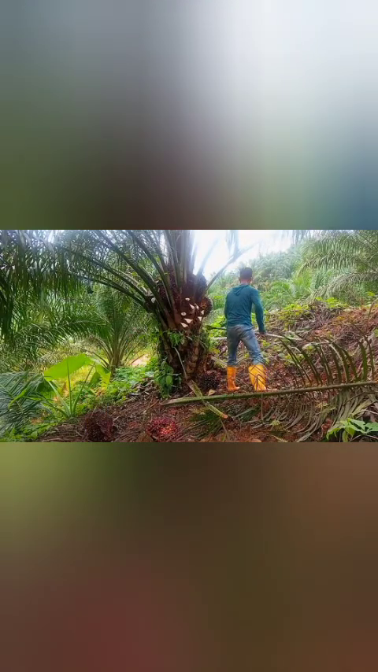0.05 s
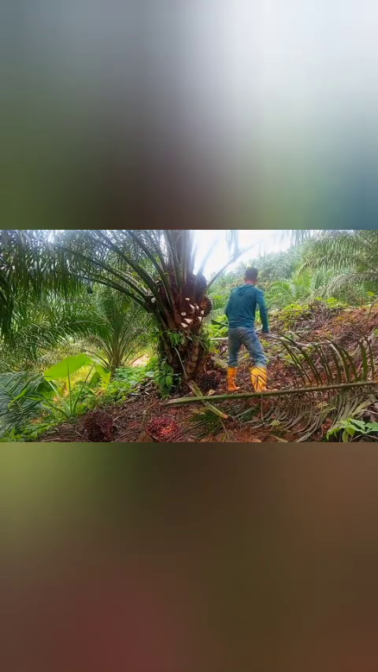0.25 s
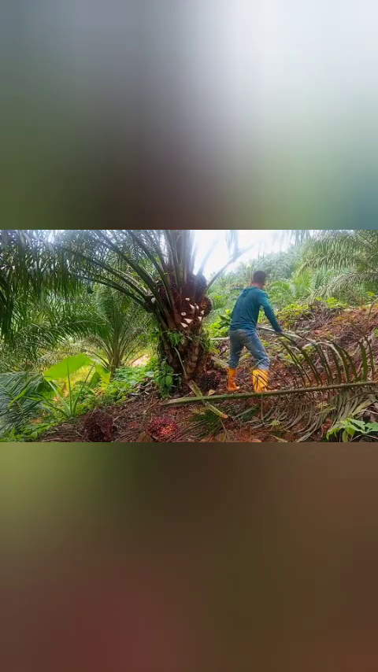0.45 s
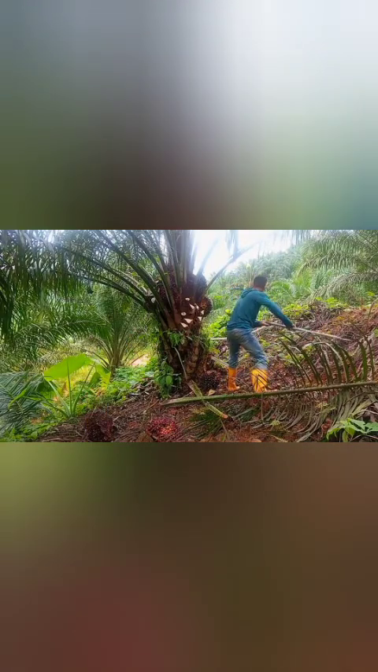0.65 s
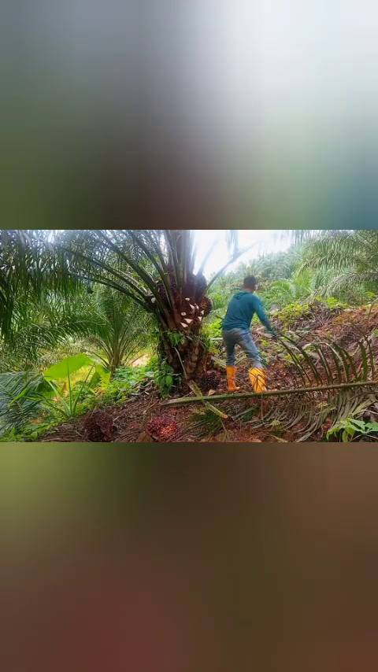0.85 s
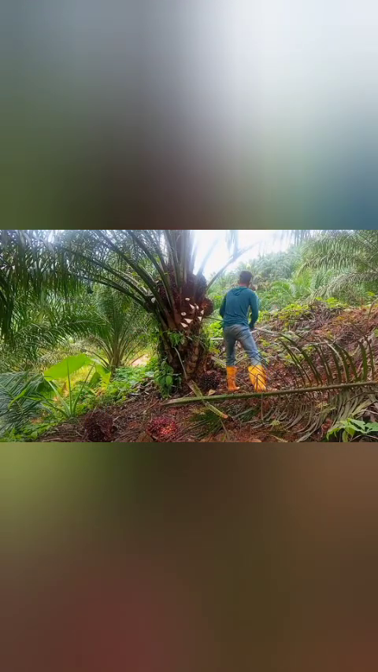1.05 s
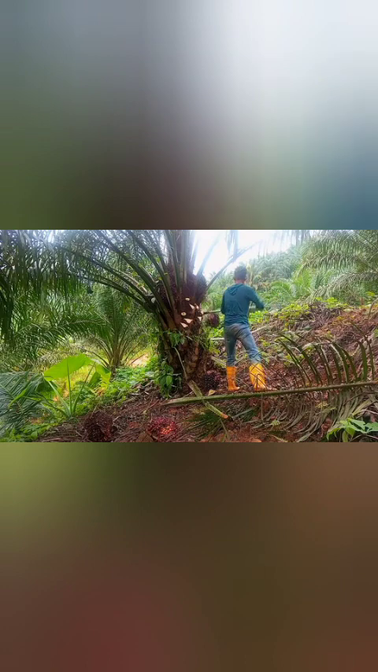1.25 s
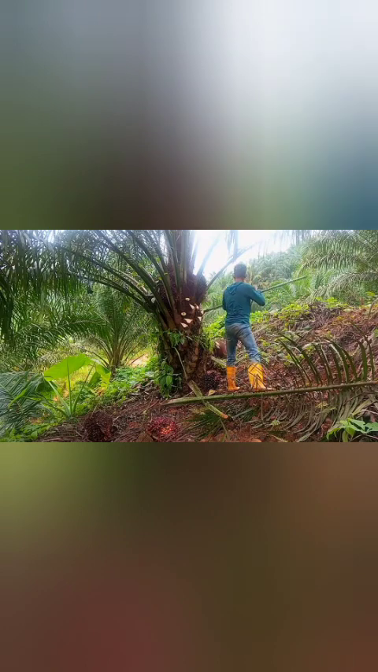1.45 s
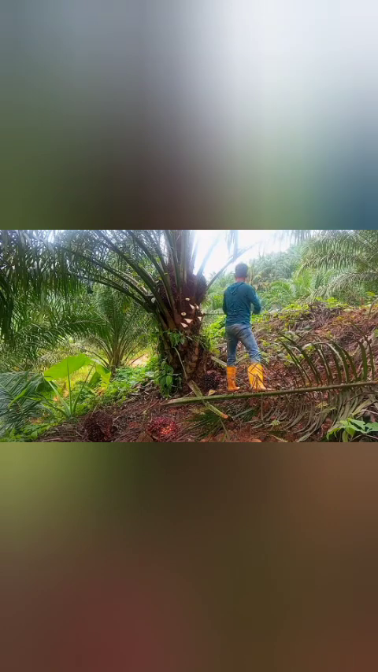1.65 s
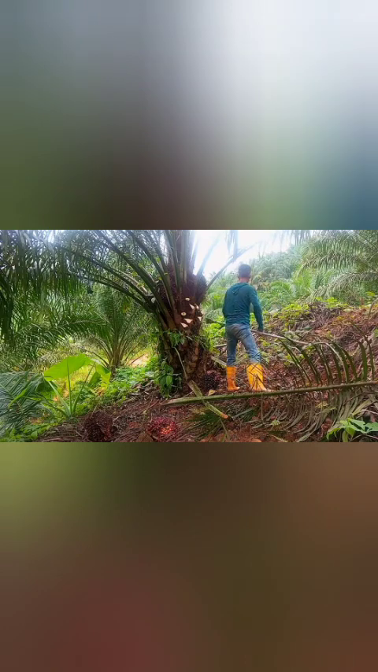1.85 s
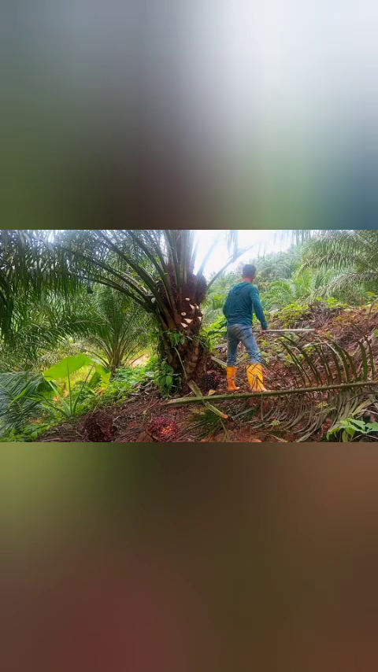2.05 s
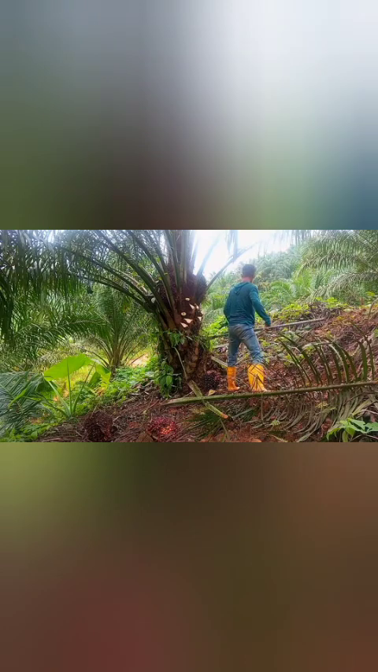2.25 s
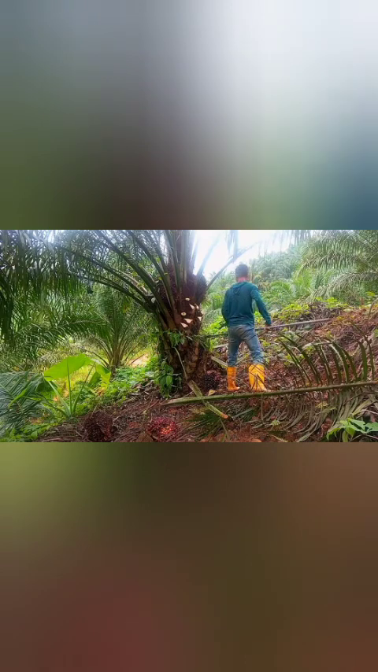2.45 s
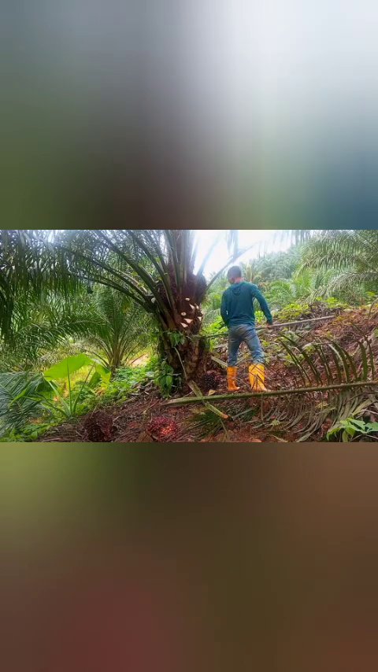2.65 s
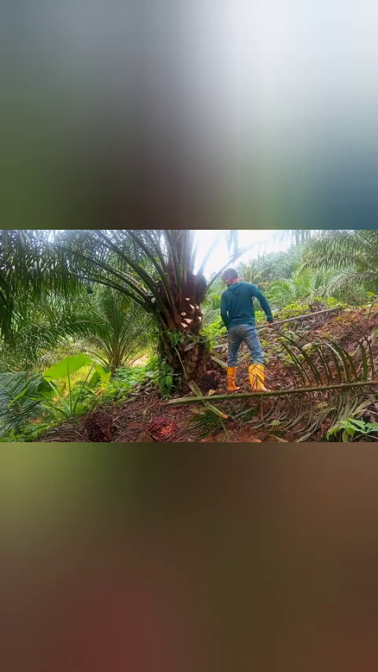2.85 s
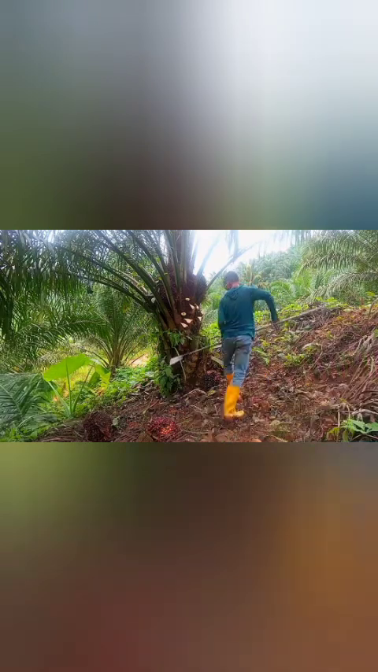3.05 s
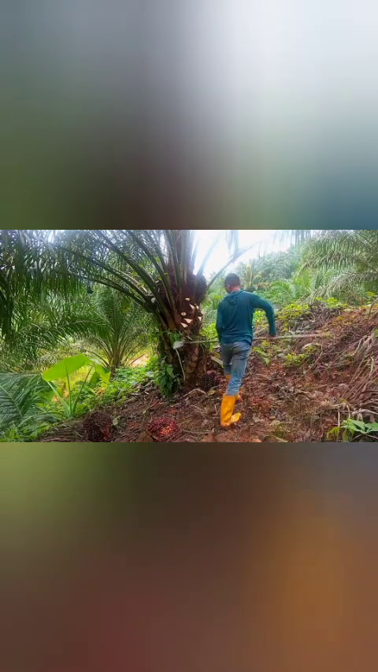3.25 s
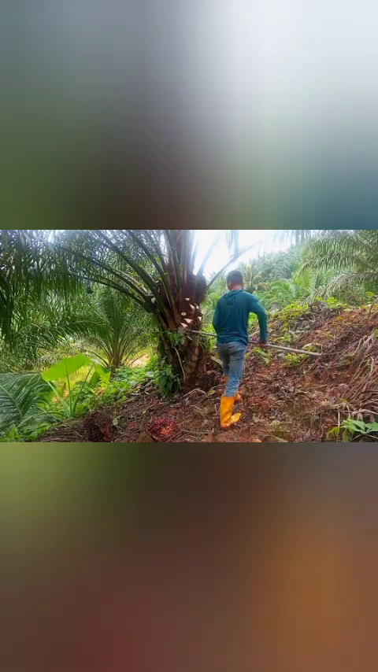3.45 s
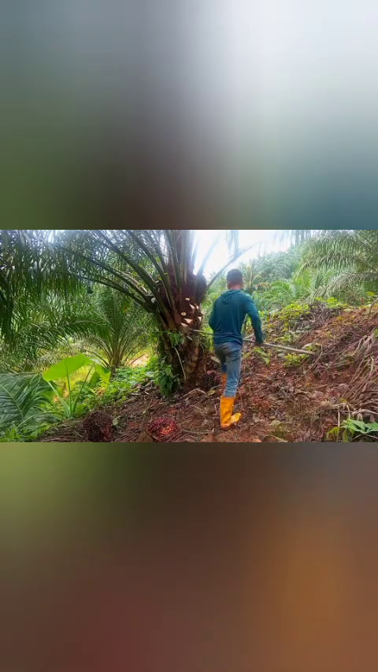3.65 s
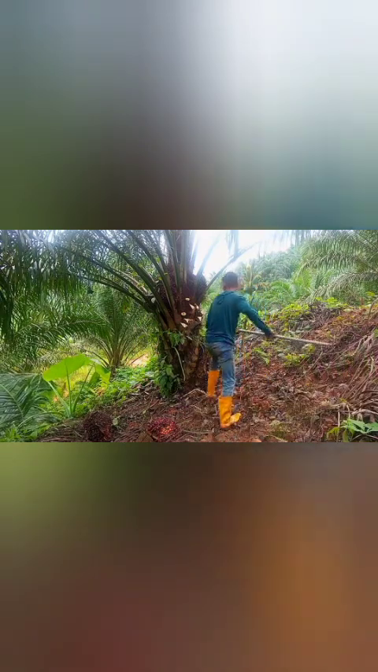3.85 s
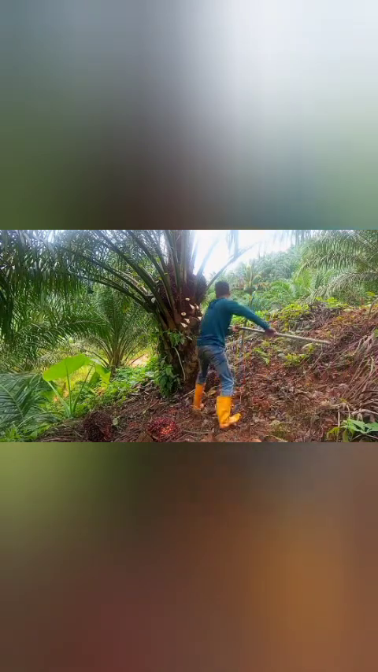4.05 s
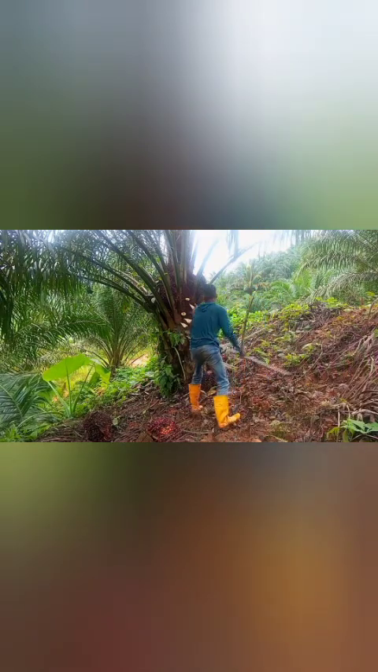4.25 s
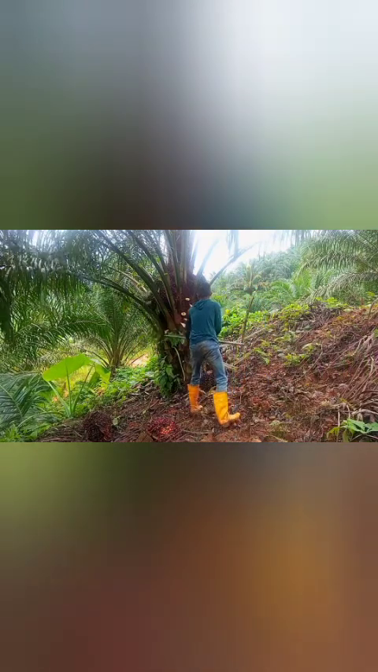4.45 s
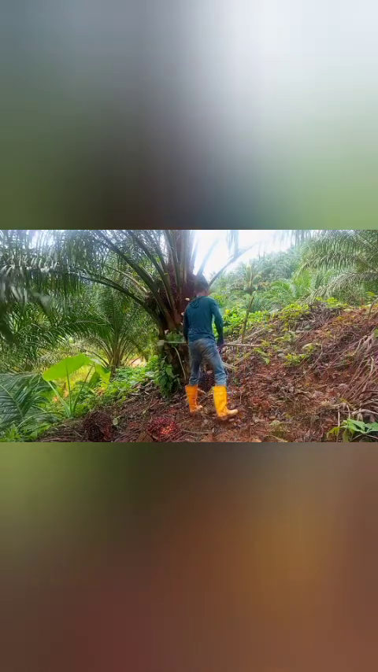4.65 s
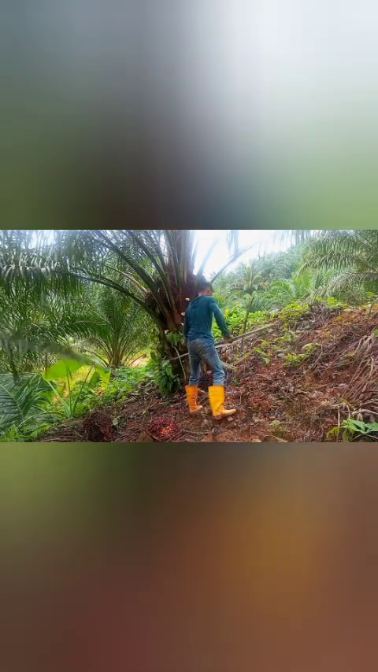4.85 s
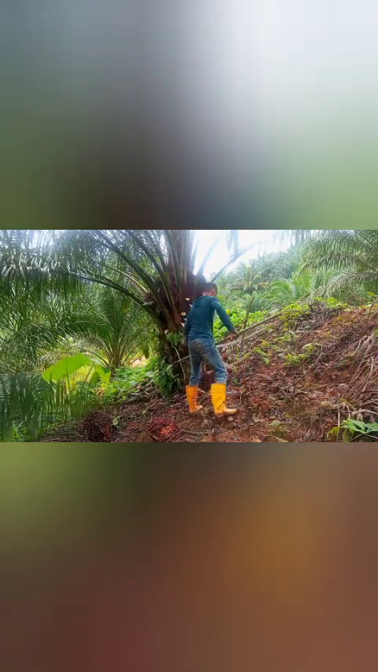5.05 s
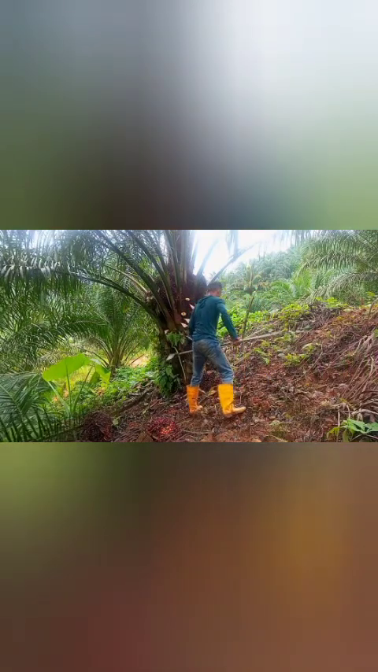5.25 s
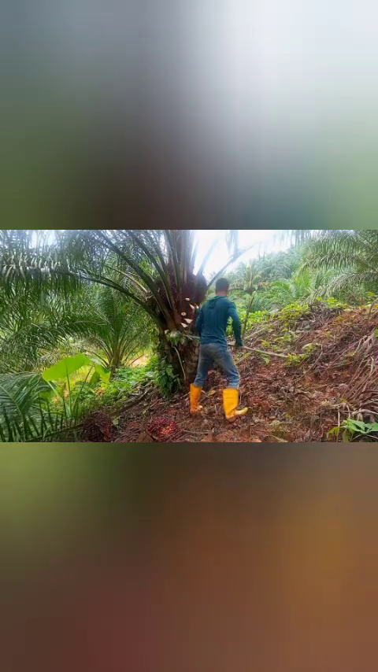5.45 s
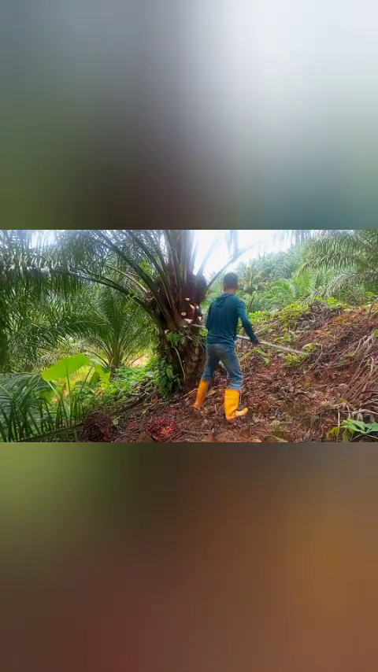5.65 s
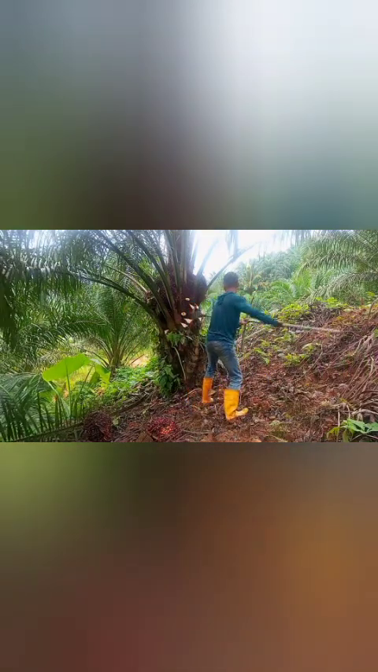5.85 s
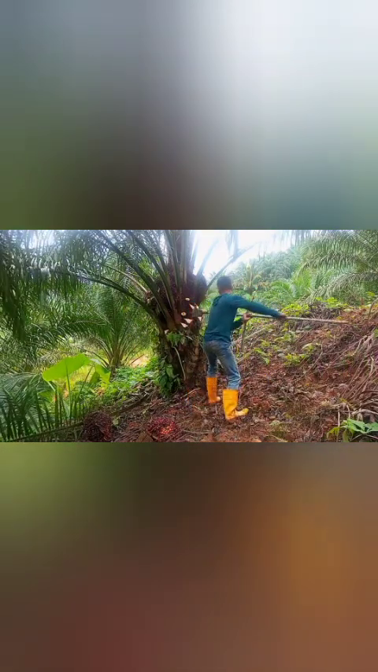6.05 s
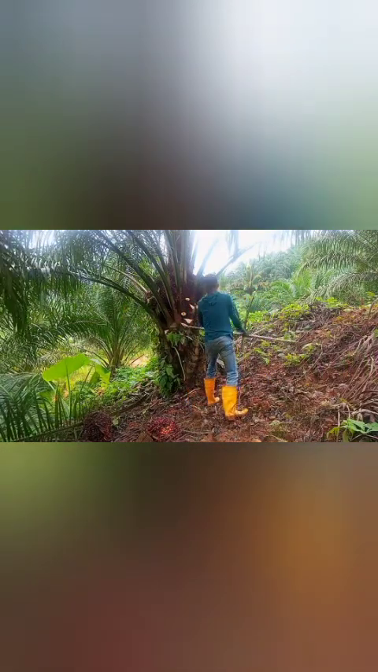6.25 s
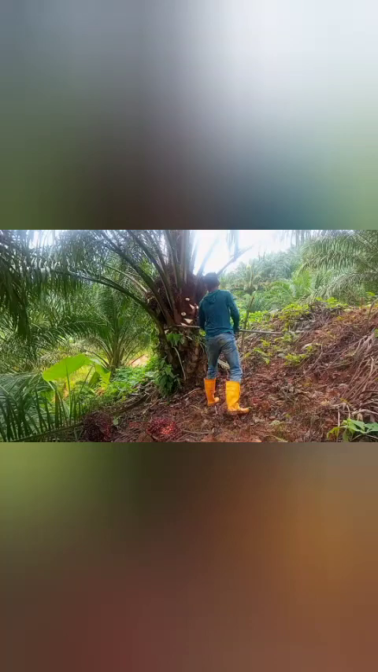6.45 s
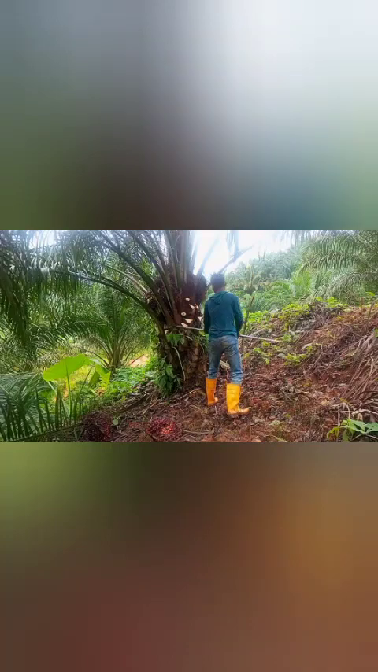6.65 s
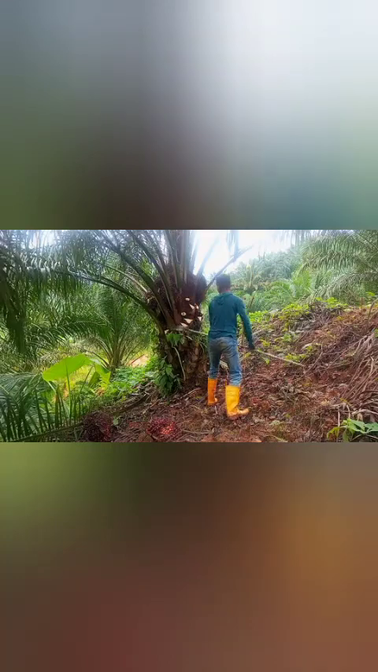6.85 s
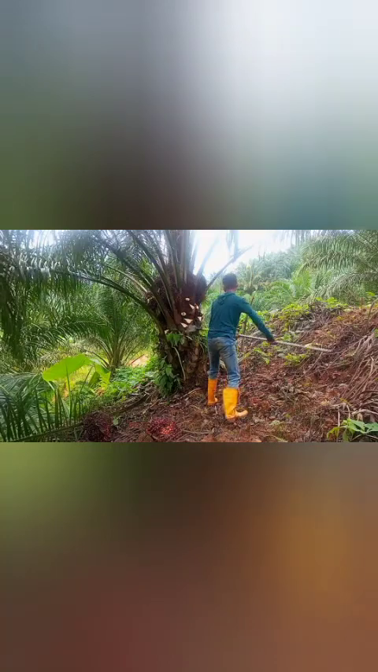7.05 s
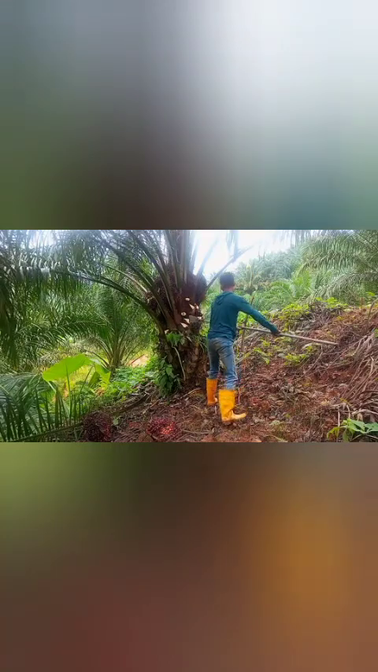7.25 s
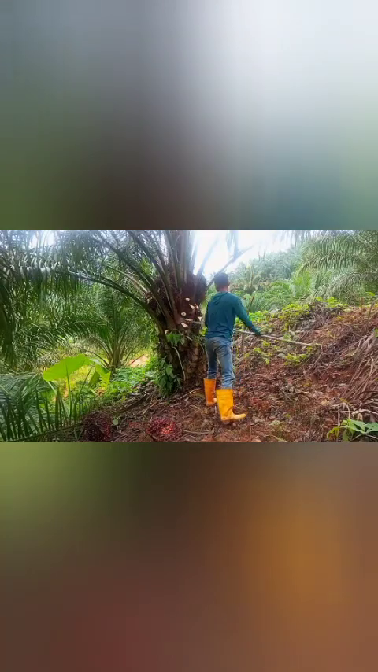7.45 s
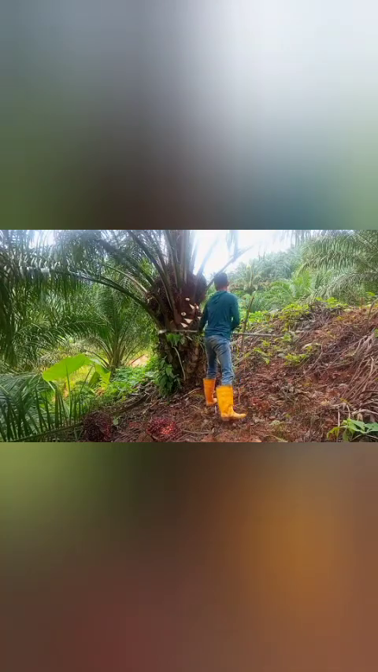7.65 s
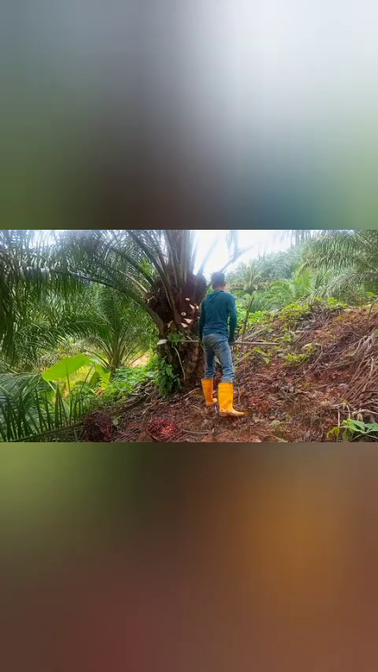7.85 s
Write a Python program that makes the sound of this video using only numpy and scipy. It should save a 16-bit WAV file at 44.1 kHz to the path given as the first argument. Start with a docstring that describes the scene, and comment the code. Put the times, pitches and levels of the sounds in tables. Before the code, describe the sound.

Outdoors on a palm slope, a long-handled blade strikes stalks some metres from a small microphone. A crunchy chop near one second leads to smaller knocks and tearing, then a pause. A hard blow after four seconds brings a frond down, rustling and dragging. More chops follow near six and seven and a half seconds. High cicadas buzz steadily behind, with cricket trills, faint birdsong and a distant rooster.

```python
"""On a plantation slope, a long-handled chisel chops palm stalks some metres away.
Each cut is crackling, coloured noise for torn fibre and leaflets, plus ringing tones for the knocked stalk;
a frond falls and is dragged, low swings thud on the soil and a rubber boot creaks.
Behind it are a cicada chorus of dense clicks, a rasping cricket, short gliding notes of birds and an insect,
a far rooster of a few hoarse partials and a faint stir of air."""
import sys
import numpy as np
from scipy import signal
from scipy.io import wavfile
from scipy.ndimage import uniform_filter1d, map_coordinates

SR = 44100
rng = np.random.default_rng(int(sys.argv[2]) if len(sys.argv) > 2 else 0)


def to_wav(s):
    """Save 16-bit WAV."""
    ch = np.atleast_2d(s).T  # columns
    pcm = np.round(np.clip(ch, -1, 1) * 32767)  # PCM
    wavfile.write(sys.argv[1], SR, pcm.astype(np.int16))


N = 348831
T = np.arange(N) / SR  # t/s of every sample

# Tone colours, relative only: f/Hz, level/dB (per Hz)
AIR_COLOUR = [(20, -14), (45, -9.5), (100, -1), (200, -5), (500, -9.5), (1700, -12), (3500, -10.5),
              (8500, -20), (10500, -20), (13000, -32), (15000, -23), (16000, -25)]
CICADA_COLOUR = [(3600, -32.5), (4200, -13.5), (4800, -6), (5400, 2.5), (6000, -1), (6500, 0), (7500, 3),
                 (8000, -3), (8500, -23.5), (9200, -52)]
CRUNCH_COLOUR = [(200, -26.5), (400, -8), (600, -3.5), (950, -11), (1300, -5), (1800, -2.5), (2500, -3.5),
                 (3500, -30.5)]
HISS_COLOUR = [(1500, -22.5), (2500, -2), (4000, -3.5), (6000, -2.5), (7000, -9), (8500, -13.5),
               (10000, -28)]
FIZZ_COLOUR = [(7500, -25), (9000, -1), (10500, -12), (12000, -18), (13500, -14.5), (14900, -1.5),
               (16000, -15.5)]
RUMBLE_COLOUR = [(40, -42.5), (65, -18.5), (110, -10.5), (200, 1), (300, -5), (450, -21)]
# Faint stir of the grove, before small random drifts: t/s, level/dB
BREEZE_LEVEL = [(0, -74.5), (1.9, -75), (2.96, -76.5), (2.98, -73.5), (4.3, -75), (6.3, -71.5), (7.9, -71)]
# Cicada chorus, before small random drifts: t/s, level/dB
CHORUS_LEVEL = [(0, -60.5), (0.499, -61.5), (1.399, -61), (1.899, -62), (3, -62), (4.3, -61.5),
                (5.8, -58.5), (6.501, -60.5), (7.9, -59.5)]
# Cricket trills, level before the wing strokes shape it: start t/s, length t/s, level/dB
CRICKET_TRILLS = [(0.356, 0.26, -60.5), (1.62, 0.13, -66), (2.738, 0.21, -64.5), (3.589, 0.3, -63.5),
                  (5.775, .33, -64), (6.993, 0.25, -63)]
# Levels of the four note tables below are before the mix of pure and fuzzy tone.
# Single notes of birds, an insect chirp near 5.3 kHz and a high overtone of the rooster's last syllable:
# start t/s, length t/s, first f/Hz, last f/Hz, level/dB
SINGLE_NOTES = [(1.169, 0.042, 2590, 2520, -65), (1.19, 0.043, 3340, 3370, -66),
                (1.304, 0.11, 3630, 3580, -68.5), (1.787, 0.06, 5300, 5400, -57),
                (1.89, 0.061, 3140, 2090, -72.5), (2.8, 0.056, 3560, 3440, -64),
                (2.823, 0.043, 3150, 2660, -66), (3.5, 0.42, 7420, 7680, -67),
                (6.66, 0.047, 1620, 1860, -66.5), (6.713, 0.012, 1970, 2150, -58),
                (7.5, 0.031, 3670, 3630, -66)]
# A bird whistles down a scale: start t/s, number of notes, first note f/Hz, step f/Hz, loudest level/dB
BIRD_SCALES = [(0.159, 9, 2988, -31.5, -67), (3.926, 5, 3016, -61.5, -68.5)]
# Another bird repeats one call: t/s, level/dB
CALL_TIMES = [(2.004, -62.5), (2.37, -61), (2.724, -63.5)]
# Notes of that call: t/s from the call's time, length t/s, first f/Hz, last f/Hz, level/dB against the call
CALL_NOTES = [(-.04, 0.043, 1990, 3150, -13), (-.015, 0.048, 3150, 2830, -5.5), (0, 0.072, 3670, 3630, 1.5),
              (0.042, .07, 2600, 3150, -14), (0.064, 0.078, 3700, 3590, -9.5)]
# Rooster syllables, before waver and flutter: start t/s, length t/s, first f/Hz, last f/Hz,
# first partial level/dB, its change by the end level/dB, second partial level/dB
CROW_SYLLABLES = [(2.973, 0.1, 969, 912, -56, -15.5, -84), (3.09, 0.038, 1087, 990, -68, -20, -78),
                  (3.247, 0.038, 1010, 1025, -63.5, -7, -86), (3.347, 0.034, 1130, 1030, -66, -14, -81),
                  (3.388, 0.09, 1015, 970, -85, 6, -77), (3.498, 0.36, 995, 1041, -67, 0, -75)]
# Creaks of a rubber boot: start t/s, length t/s, level/dB
BOOT_CREAKS = [(3.235, 0.026, -65), (4.059, 0.083, -67.5)]
# Heavy drops on soil: t/s, level/dB at the start, starting f/Hz, time to fade 60 dB t/s
SOIL_THUDS = [(1.085, -38, 107.3, 0.22), (1.109, -49, 99, 0.2), (1.414, -44, 130, 0.11),
              (1.611, -9, 153, 0.014), (4.363, -42, 171, 0.05), (4.947, -50, 84, 0.083),
              (5.192, -33.5, 170, 0.055), (5.39, -50, 350, .08), (6.432, -44, 92, 0.078),
              (7.598, -49, 105, 0.37)]
# Ringing tones (modes) of stalk and blade, before a blow detunes and damps them:
# f/Hz, level/dB, time to fade 60 dB t/s
STALK_MODES = [(422, -6, 0.056), (549, 1.5, 0.03), (940, 4.5, 0.011), (1249, -2.5, 0.02), (1773, 2, 0.02),
               (2310, -4, 0.013), (2587, 3, 0.021), (3200, -1, 0.009), (4650, -3, 0.023),
               (5370, -2.5, .025), (6500, -4.5, 0.0067), (7000, 0.5, .02)]
# Knocks of blade or stalk: t/s, peak level/dB of the ring, centre of what rings f/Hz
STALK_KNOCKS = [(0.03, -38, 920), (0.991, -39, 1770), (1.001, -20, 5030), (1.006, -27, 2950),
                (1.017, -22, 5070), (1.044, -28.5, 673), (1.074, -25.5, 727), (1.407, -30.5, 1130),
                (1.43, -31, 780), (1.478, -30.5, 1030), (1.486, -33.5, 590), (1.548, -30, 4930),
                (1.689, -43, 4260), (1.716, -64, 1150), (1.767, -46, 900), (1.79, -54.5, 716),
                (4.353, -19.5, 3890), (4.381, -20, 3900), (4.439, -32, 5300), (4.588, -27.5, 1700),
                (4.604, -43, 2340), (4.968, -34, 4770), (5.256, -34, 3980), (6.32, -29, 1120),
                (6.327, -21, 2020), (6.343, -24, 1780), (6.367, -25.5, 1290), (6.454, -42, 492),
                (6.47, -33, 820), (6.587, -52.5, 577), (6.784, -33.5, 1850), (6.786, -43, 573),
                (6.799, -43, 1340), (6.807, -46, 520), (6.86, -25.5, 5100), (6.862, -35, 2320),
                (6.872, -39, 5010), (7.583, -18, 1770), (7.596, -17, 5400), (7.661, -31, 570),
                (7.695, -30.5, 5530), (7.719, -34.5, 1760), (7.739, -36.5, 1870), (7.76, -43, 1550),
                (7.762, -49, 603), (7.812, -34.5, 616), (7.836, -51, 455), (7.858, -37.5, 1130)]
# Bursts of tearing and rustling: start t/s, swell t/s, hold t/s, basic fade in dB per s, leaflet hiss level/dB,
# then against the hiss: stalk crunch level/dB, top fizz level/dB, ground rumble level/dB
TEARING_BURSTS = [(0.005, .046, .005, 420, -44, -5.5, -4.5, -16),
                  (0.85, .004, .005, 90, -67.5, -8, -30, -24),
                  (0.924, .003, 0.0033, 180, -57.5, -6, -9, -32),
                  (0.986, 0.0095, 0.012, 200, -25.5, -3.5, -18, -18),
                  (1.399, 0.014, 0.037, 450, -45.5, -2, -12, -5),
                  (1.467, 0.0024, .005, 228, -43.5, -1, -15, -3),
                  (1.545, .003, 0.021, 300, -52.5, -15, -1.5, -18),
                  (1.58, 0.031, 0.0059, 176, -41.5, -3.5, -17.5, -20),
                  (1.752, .01, .003, 327, -54, -4, -3.5, -29), (3.193, 0.043, .01, 209, -69.5, 5, -9, -10),
                  (4.323, 0.0063, .004, 602, -49.5, -8, -27, -28),
                  (4.343, 0.0068, 0.013, 205, -23, -7, -18.5, -25.5),
                  (4.582, .003, .003, 350, -34.5, -3, -9, -36),
                  (6.314, 0.0072, 0.015, 300, -25.5, -1, -20.5, -27.5),
                  (6.341, 0.0085, 0.021, 500, -31.5, -4, -11.5, -29),
                  (6.368, 0.0094, 0.028, 307, -38, -2.5, -14, -29),
                  (6.43, 0.024, 0.012, 301, -51.5, 1, -30, -11),
                  (6.537, .008, 0.011, 200, -59.5, -8.5, -17, -29),
                  (6.778, 0.0071, 0.022, 253, -47, -1, -27, -38),
                  (6.85, 0.011, 0.011, 506, -41.5, -4.5, -13, -43),
                  (7.577, 0.0081, 0.012, 302, -27.5, -2.5, -15, -30),
                  (7.601, .02, 0.042, 353, -34, -4, -13, -29),
                  (7.714, .003, 0.0033, 604, -43, -5, -9.5, -32), (7.72, .02, .2, 300, -55, -3, -12, -40)]
# Hiss, crunch, fizz and rumble fade at these multiples of the basic fade: one column, a plain factor
FADE_FACTORS = [1.015, 1.04, 1.15, 1]
# The cut frond crashes, is dragged, lands and settles: t/s, leaflet hiss level/dB, crunch level/dB against it
FROND_PATH = [(4.428, -36, 0), (4.49, -42, -4), (4.58, -39.5, -4.5), (4.73, -41.5, -5.5), (4.88, -41, -6.5),
              (4.95, -50.5, -14), (5.11, -56, -4), (5.165, -41.5, -2.5), (5.264, -33, -6.5),
              (5.37, -50, -3), (5.5, -57, -9), (6.02, -67, -7.5), (6.3, -74, -9)]

TRILL_HZ, STROKES_PER_S = 4553, 23
STEP_S, WHISTLE_S = .086, .066  # between the starts of scale notes, and length of each
DROOP_HZ, SCALE_ENDS_DB = 70, -1.5  # fall within a scale note; first and last note against the loudest
SPREAD_OCTAVES = 0.57  # how widely a blow rings
FAR_MODES_DB = -23.5  # modes far from a blow's centre are weakened no more than this
CRACK_REACH = 2.5  # a crack dulls above this multiple of the centre
DAMPING, CRACK_SHARE, BITE_S = .65, .26, .0007  # factor on ring time, crack gain, rise of the ring
SWELL_POWER = 1.5
FROND_FIZZ_DB, FROND_RUMBLE_DB = -15.5, -27  # against the hiss
ECHO_DB = -4.5
EDGE_HZ = 15750  # top of the microphone's band


def amp(db):
    """Turns decibels into a gain."""
    return 10 ** (np.asarray(db) / 20)


def evened(x):
    """Scales a sound to an average (rms) strength of one."""
    return x / np.sqrt(np.mean(x ** 2) + 1e-20)


def add(mix, s, sound):
    """Mixes a sound in at a time in seconds."""
    part = mix[round(s * SR):][:len(sound)]
    part += sound[:len(part)]


def gate(t, length, rise, fall):
    """Opens at zero, holds until the length is up, then closes; all in seconds."""
    return np.clip(t / rise, 0, 1) * np.clip((length - t) / fall + 1, 0, 1)


def wander(per_s):
    """Draws a smooth random curve through per_s chance points a second, with strength near one."""
    points = rng.standard_normal(int(N / SR * per_s) + 3)
    return map_coordinates(points, [T * per_s], order=3)


def snaps(per_s, spread_db):
    """Makes clicks of random time, sign and size, a few of them large."""
    size_db = spread_db * np.minimum(rng.exponential(1, N), 5)
    size = amp(size_db) * rng.choice([-1., 1.], N)
    return evened(size * (rng.random(N) < per_s / SR))


def coloured(x, points):
    """Gives x a tone colour; the filter only acts after a click, so clicks stay sharp at the front."""
    f, db = np.transpose(points)
    hz = abs(np.fft.fftfreq(4096, 1 / SR))
    gain_db = np.interp(np.log(hz + 1), np.log(f), db, left=-80, right=-80)
    log_gain = np.log(amp(gain_db))
    # Phase worked out from the gain, so the filter answers as early as it can
    spectrum = np.exp(np.conj(signal.hilbert(log_gain)))
    taps = np.fft.ifft(spectrum).real[:2048]
    return evened(signal.oaconvolve(x, taps)[:len(x)])


def resonate(x, hz, width):
    """Keeps a narrow band around the curve hz: shifts it to zero, smooths twice, shifts it back."""
    turn = np.exp(2j * np.pi * np.cumsum(hz * np.ones(len(x))) / SR)
    r = np.exp(-np.pi * width / SR)  # width in Hz of each smoothing
    low = x / turn
    for _ in range(2):
        low = signal.lfilter([1 - r], [1, -r], low)
    return 2 * (turn * low).real


def patchy(x, patchy_db, bins, frames):
    """Lets random patches of the spectrum swell and fade on their own."""
    hz, t, z = signal.stft(x, SR, nperseg=512)
    patches = rng.standard_normal((len(t), len(hz))).T
    patches = uniform_filter1d(patches, size=bins, axis=0)
    patches = evened(uniform_filter1d(patches, size=frames, axis=1))
    return evened(signal.istft(z * amp(patchy_db * patches), SR, nperseg=512)[1][:N])


def grove(x, t60):
    """Trunks and slope scatter the sound back as sparse echoes that fade 60 dB in t60 seconds."""
    taps = np.zeros(20000)
    at = np.arange(200, 19978, 22) + rng.integers(0, 22, 899)  # one echo at random in every 22 samples
    taps[at] = rng.choice([-1., 1.], len(at)) * amp(-60 * at / SR / t60)
    return signal.oaconvolve(x, taps / np.linalg.norm(taps))[:N]


def breeze():
    """The faint stir of the grove is coloured noise with a slowly drifting level."""
    noise = patchy(coloured(rng.standard_normal(N), AIR_COLOUR), 2.4, bins=2, frames=10)
    s, db = np.transpose(BREEZE_LEVEL)
    return noise * amp(np.interp(T, s, db) + 0.96 * wander(4.6))


def cicadas():
    """Many drum-skins click too fast to count; the chorus throbs a little and drifts in patches."""
    clicks = snaps(8800, spread_db=4.0) + 2.1 * rng.standard_normal(N)
    chorus = patchy(coloured(clicks, CICADA_COLOUR), 2.8, bins=3, frames=8)
    s, db = np.transpose(CHORUS_LEVEL)
    throb_db = 0.43 * wander(15) + 0.72 * wander(160)
    return chorus * amp(np.interp(T, s, db) + throb_db)


def rooster():
    """Two main partials carry over the distance, hoarse and fluttering."""
    hoarse, out = rng.standard_normal(N), np.zeros(N)
    flutter, waver = amp(3.9 * wander(60)), 1 + 0.0084 * wander(50)  # of loudness, of pitch
    for start, length, from_hz, to_hz, db, change_db, second_db in CROW_SYLLABLES:
        i, t = round(start * SR), T[:round((length + .022) * SR)]
        pitch = (from_hz + (to_hz - from_hz) * t / length) * waver[i:i + len(t)]
        for k, partial_db in [(1, db + change_db * t / length), (2, second_db)]:
            clear = np.sqrt(2) * np.sin(2 * np.pi * k * np.cumsum(pitch) / SR)
            rough = evened(resonate(hoarse[i:i + len(t)], k * pitch, 97))
            voice = 0.52 * clear + 0.54 * rough
            add(out, start, voice * amp(partial_db) * gate(t, length, .0056, 0.011))
    return out * flutter


def all_notes():
    """Lists single notes, scales (loudest in the middle) and the call, repeated note for note."""
    notes = list(SINGLE_NOTES)
    for start, count, first_hz, step_hz, db in BIRD_SCALES:
        for k in range(count):
            hz = first_hz + k * step_hz
            from_middle = 2 * k / (count - 1) - 1  # -1 at the first note, 1 at the last
            note_db = db + SCALE_ENDS_DB * from_middle ** 2
            notes.append((start + k * STEP_S, WHISTLE_S, hz, hz - DROOP_HZ, note_db))
    for s, db in CALL_TIMES:
        for after, length, from_hz, to_hz, under_db in CALL_NOTES:
            notes.append((s + after, length, from_hz, to_hz, db + under_db))
    return notes


def gliding_notes():
    """Each note mixes a pure tone with a narrow noise; the faster it glides, the more foliage smears it."""
    out, blur = np.zeros(N), rng.standard_normal(N)
    for s, length, from_hz, to_hz, db in all_notes():
        hz = np.linspace(from_hz, to_hz, round(length * SR))
        pure = np.sqrt(2) * np.sin(2 * np.pi * np.cumsum(hz) / SR)
        width = 90 + 0.049 * abs(to_hz - from_hz) / length
        fuzzy = evened(resonate(blur[round(s * SR):][:len(hz)], hz, width))
        note = (0.26 * pure + 0.45 * fuzzy) * signal.windows.tukey(len(hz), .35)
        add(out, s, amp(db) * note)
    return out


def cricket():
    """Each wing stroke is a short rasp in a narrow ring; a trill starts low and faint, then swells."""
    rasp, out = rng.standard_normal(N), np.zeros(N)
    for start, length, db in CRICKET_TRILLS:
        t = T[:round(length * SR)]
        stroke_part = np.clip(t * STROKES_PER_S % 1 / 0.89, 0, 1)  # 0 to 1 within each stroke
        strokes = 0.12 + np.sin(np.pi * stroke_part)
        early = np.exp(-t / 0.087)
        ring = resonate(rasp[round(start * SR):][:len(t)], TRILL_HZ * (1 - .07 * early), 210)
        add(out, start, evened(ring) * strokes * amp(db - 10 * early))
    return out


def boot():
    """Uneven slips of rubber ring the hollow of the boot."""
    creak = evened(resonate(snaps(180, spread_db=1.0), 348, 145))
    return creak * sum(amp(db) * gate(T - s, length, 0.0065, .025) for s, length, db in BOOT_CREAKS)


def thuds():
    """Soft soil takes the weight: a low swing that sinks in pitch."""
    out, t = np.zeros(N), T[:12000]
    for s, db, hz, t60 in SOIL_THUDS:
        swing = np.sin(2 * np.pi * hz * t * (1 - 1.6 * t))
        add(out, s, amp(db - 60 * t / t60) * swing * (1 - np.exp(-t / 0.0045)))
    return out


def knocks():
    """A blow cracks briefly as noise and rings the modes nearest to its own centre."""
    out, t = np.zeros(N), T[:4000]
    hz, mode_db, t60 = np.transpose(STALK_MODES)[:, :, None]
    for s, db, centre_hz in STALK_KNOCKS:
        octaves_off = np.log2(hz / centre_hz)
        near_db = np.maximum(-12 * (octaves_off / SPREAD_OCTAVES) ** 2, FAR_MODES_DB)
        detune = .98 + 0.019 * rng.random((len(STALK_MODES), 1))
        modes = amp(mode_db + near_db - 60 * t / (t60 * DAMPING)) * np.sin(2 * np.pi * hz * detune * t)
        ring = modes.sum(0) * (1 - np.exp(-t / BITE_S))
        crack = rng.standard_normal(len(t)) * np.exp(-t / 0.0014)
        dull = signal.lfilter(*signal.butter(2, min(CRACK_REACH * centre_hz, .45 * SR), fs=SR), crack)
        dull *= np.linalg.norm(crack) / np.linalg.norm(dull)  # as strong as before dulling
        add(out, s, amp(db) * (ring / abs(ring).max() + CRACK_SHARE * dull))
    return out


def ringing_snaps(modes, per_s):
    """Stray snaps of fibre, each ringing one mode of the stalk."""
    t, out = T[:3000], np.zeros(N)
    for hz, db, t60 in modes:
        ring = amp(db - 60 * t / t60) * np.sin(2 * np.pi * hz * t) / np.sqrt(t60)
        out += signal.oaconvolve(snaps(per_s, spread_db=3.5), ring)[:N]
    return evened(out)


def tearing_layers():
    """Snapping fibre coloured as leaflet hiss, stalk crunch and top fizz, with a noise rumble below."""
    crackle = snaps(3000, spread_db=2.0) + 0.93 * rng.standard_normal(N)
    fibres = patchy(crackle, 2.42, bins=3, frames=5)
    hiss = evened(coloured(fibres, HISS_COLOUR) + 0.043 * ringing_snaps(STALK_MODES[6:], 270))
    crunch = evened(coloured(fibres, CRUNCH_COLOUR) + .5 * ringing_snaps(STALK_MODES[:6], 80))
    fizz = coloured(fibres, FIZZ_COLOUR)
    rumble = coloured(rng.standard_normal(N), RUMBLE_COLOUR)
    return np.array([hiss, crunch, fizz, rumble])


def tearing():
    """Fibres tear in clumps: the frond's path and the bursts set how loud each layer is."""
    layers = tearing_layers()
    s, hiss_db, crunch_db = np.transpose(FROND_PATH)
    frond = amp(np.interp(T, s, hiss_db)) * gate(T - s[0], s[-1] - s[0], 0.0018, .02)
    frond_crunch = frond * amp(np.interp(T, s, crunch_db))
    gains = np.array([frond, frond_crunch, frond * amp(FROND_FIZZ_DB), frond * amp(FROND_RUMBLE_DB)])
    for start, swell, hold, fade_db, db, *over_db in TEARING_BURSTS:
        part = gains[:, round(start * SR):][:, :SR // 2]
        t = T[:part.shape[1]]
        fading_s = np.maximum(t - swell - hold, 0)
        rise = np.minimum(t / swell, 1) ** SWELL_POWER
        shape = rise * amp(db - fade_db * np.outer(FADE_FACTORS, fading_s))
        # Where sounds overlap, the louder one sets the level
        part[:] = np.maximum(part, shape * amp([0] + over_db)[:, None])
    clumps = amp(0.23 * wander(130) + 0.15 * wander(36))
    return (layers * gains).sum(0) * evened(clumps)


def scene():
    """Puts the work in front and the grove around it."""
    far = gliding_notes() + rooster() + cricket()
    blows = knocks() + thuds()
    background = breeze() + cicadas() + far + amp(ECHO_DB) * grove(far, 0.12)
    work = boot() + blows + amp(ECHO_DB) * grove(blows, 0.1) + tearing()
    return (background + work)[None]


def record(dry):
    """The small microphone drops the deep bass, rounds the loudest peaks and cuts the very top."""
    thin = signal.sosfilt(signal.butter(2, 58, "high", fs=SR, output="sos"), dry)
    rounded = .4 * np.tanh(thin / .4)
    band = signal.firwin(511, EDGE_HZ, window=("kaiser", 9), fs=SR)
    return signal.oaconvolve(rounded, band[None], "same")


dry = scene()
out = record(dry)
to_wav(out)
```